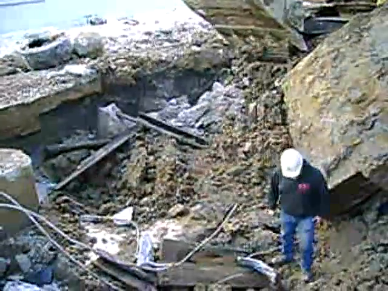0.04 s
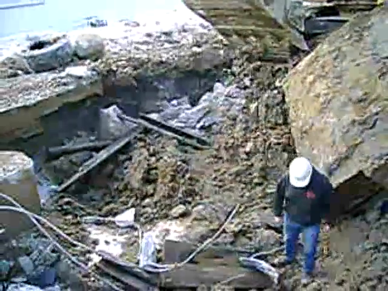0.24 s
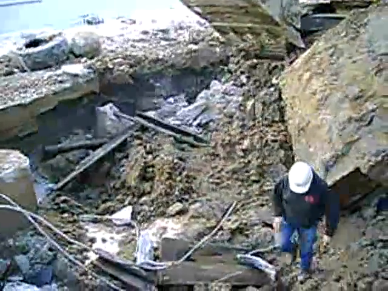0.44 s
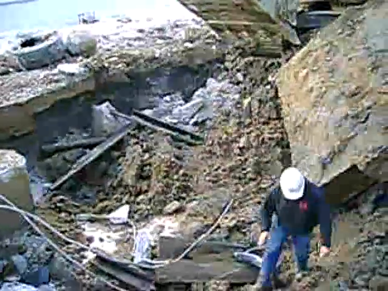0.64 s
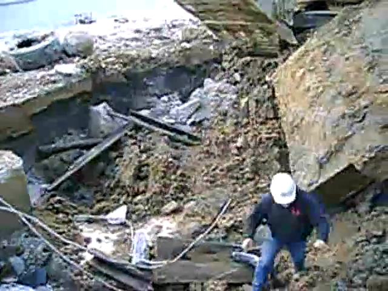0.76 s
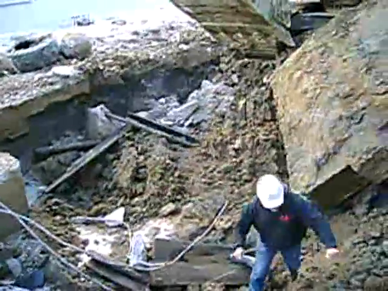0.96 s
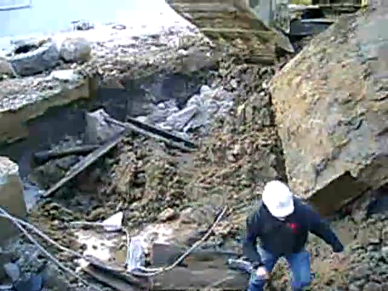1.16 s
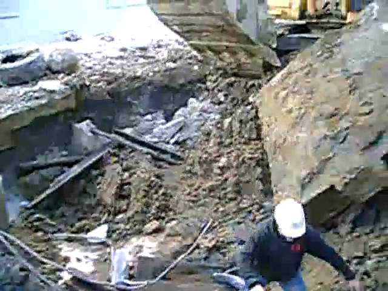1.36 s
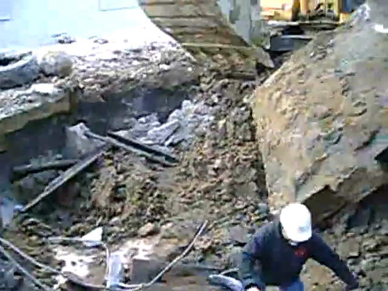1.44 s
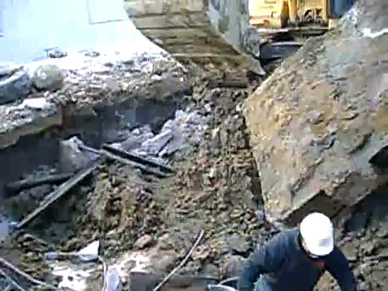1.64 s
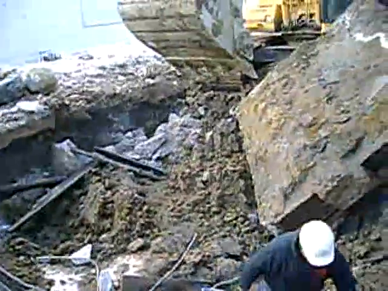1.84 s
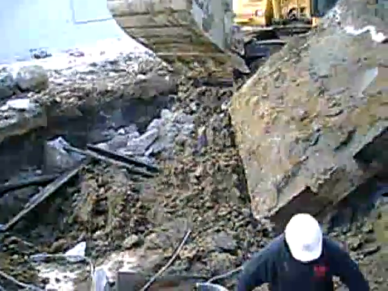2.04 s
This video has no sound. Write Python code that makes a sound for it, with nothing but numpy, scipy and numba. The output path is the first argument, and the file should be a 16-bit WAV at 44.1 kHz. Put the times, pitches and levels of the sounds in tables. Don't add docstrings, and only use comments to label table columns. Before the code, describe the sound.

Steady diesel idle on an open building site, with uneven valve ticks and a wavering pump whine; wind crackles early, eases, then returns in hard thumps around one second and near the end, on a coarse small microphone.

```python
import sys
import numpy as np
from scipy import signal
from scipy.fft import rfft, irfft, next_fast_len
from scipy.io import wavfile
from scipy.ndimage import uniform_filter1d
from numba import njit

SR = 44100
rng = np.random.default_rng(int(sys.argv[2]) if len(sys.argv) > 2 else 0)


def wav_out(sig):
    wavfile.write(sys.argv[1], SR, np.round(np.clip(np.atleast_2d(sig).T, -1, 1) * 32767).astype(np.int16))


def natural_amplitude(level_db):
    exponent = np.asarray(level_db, float) / 20
    return 10 ** exponent


N = 92433


def level(x, db):
    return x * natural_amplitude(db) / np.sqrt(np.mean(x ** 2))


@njit
def svf(x, hz, k):
    low, band = np.empty(len(x)), np.empty(len(x))
    b, l = 0., 0.
    for i in range(len(x)):
        g = np.tan(np.pi * hz[i] / SR)
        v = (b + g * (x[i] - l)) / (1 + g * (g + k))
        low[i], band[i] = l + g * v, k * v
        b, l = 2 * v - b, l + 2 * g * v
    return low, band


def walk(rate):
    hold = int(SR / rate)
    steps = np.repeat(rng.standard_normal(N // hold + 1), hold)
    return 1.2 * uniform_filter1d(uniform_filter1d(steps, hold), hold)[:N]


def band(hz, width):
    return svf(rng.standard_normal(N), np.full(N, 1. * hz), width / hz)[1]


def line(hz, width):
    drift = hz + width * walk(9)
    swell_db = 3.5 * walk(6.5)
    return np.cos(2 * np.pi * np.cumsum(drift) / SR) * natural_amplitude(swell_db)


# middle [t/s], length [t/s], level [level/dB], pitch centre [f/Hz]
WIND_PUFFS = [(.01, 0.047, -29, 465), (0.061, 0.25, -22.5, 260), (0.15, 0.07, -24.5, 190),
              (0.314, 0.011, -37, 170), (0.587, 0.022, -31, 282), (0.812, 0.028, -30.5, 141),
              (0.866, 0.036, -26.5, 296), (0.999, 0.091, -29, 166), (1.068, 0.1, -24, 283),
              (1.176, 0.088, -24.5, 192), (1.325, 0.068, -27, 260), (1.397, 0.076, -28.5, 197),
              (1.679, 0.039, -24.5, 201), (1.762, 0.097, -24, 201), (1.831, 0.034, -22.5, 130),
              (1.887, 0.11, -21.5, 327), (1.98, 0.028, -25, 159), (2.038, 0.051, -33, 164)]


def wind_puffs():
    breeze_db, edge = -41, 3.5
    eddies_per_s, eddy_spread_db = 900, 1.5
    t, rows = np.arange(N) / SR, np.array(WIND_PUFFS)
    middle, length, puff_db = rows[:, :1], rows[:, 1:2], rows[:, 2:3]
    puffs = np.exp(-np.abs(2 * (t - middle) / length) ** edge) * natural_amplitude(puff_db)
    gust = np.sqrt((puffs ** 2).sum(0) + natural_amplitude(breeze_db) ** 2)
    hz = np.interp(t, rows[:, 0], rows[:, 3])

    draw = rng.random((3, N))
    hits = draw[0] < eddies_per_s / SR
    push = np.sign(draw[1] - .55)
    eddies = hits * push * natural_amplitude(-eddy_spread_db * np.log(draw[2] + 0.011))
    knock = svf(eddies - eddies.mean(), hz, 1.4)[1]
    knock = svf(knock, 2.53 * hz, 1.9)[0]
    knock = knock / np.sqrt(uniform_filter1d(knock ** 2, int(0.022 * SR)) + 1e-12)
    return gust * knock


# time [t/s], peak [level/dB], width [ms]
HARD_EDDIES = [(.0014, -13.5, 0.85), (.0083, -13.5, 0.65), (0.0153, -14, 1.24), (0.0204, -14, 1.26),
               (0.0238, -16, 1.0), (0.0323, -9, 1.6), (0.0454, -14, 1.8), (0.0536, -12.5, 1.24),
               (0.06, -10, 1.3), (0.0685, -15, 2.9), (0.0752, -9.5, 1.2), (0.0823, -13, 2.0),
               (.0914, -12, 0.7), (0.1067, -15, 3.3), (0.1297, -11, 1.6), (0.1493, -18, 1.9),
               (0.1636, -17.5, 1.1), (0.5774, -17, 1.4), (0.8339, -14.5, 1.74), (.869, -11.5, 1.6),
               (1.0453, -11, 0.57), (1.0546, -13, 1.1), (1.0589, -12.5, 0.78), (1.0621, -13, 1.08),
               (1.0656, -12, 1.16), (1.0693, -11, 1.14), (1.077, -14.5, 0.96), (1.0884, -10, .8),
               (1.094, -10.5, 1.5), (1.1022, -14, 1.2), (1.107, -11.5, 1.64), (1.1587, -11, 1.57),
               (1.1657, -5, 0.75), (1.1706, -7, 0.81), (1.1768, -8.5, 1.84), (1.1816, -10, 1.5),
               (1.1942, -15.5, 1.94), (1.2163, -13.5, 1.8), (1.3298, -14.5, 1.26), (1.7541, -15, 1.55),
               (1.7908, -18, 1.8), (1.8428, -10.5, 1.5), (1.852, -9, 2.1), (1.8572, -11, 1.2),
               (1.8628, -7.5, 0.65), (1.8742, -9, 0.62), (1.878, -12, 1.1), (1.8819, -7, 1.85),
               (1.8907, -10, 1.5), (1.8946, -17, 0.99), (1.8989, -13, 1.53), (1.904, -14.5, 1.5),
               (1.909, -10.5, .95), (1.9167, -11, 2.9), (1.923, -16, 2.3), (1.9335, -7.5, 0.55)]


def wind_snaps():
    spread, rebound, reach_s = 0.59, 0.77, .012
    t, snaps = np.arange(N) / SR, np.zeros(N)
    for at, db, ms in HARD_EDDIES:
        near = slice(max(int((at - reach_s) * SR), 0), int((at + reach_s) * SR))
        u = ((t[near] - at) / (spread * ms / 1000)) ** 2
        snaps[near] += natural_amplitude(db) * (1 - rebound * u) * np.exp(-u / 2)
    return -snaps


def wind():
    rumble = level(band(7.9, 11), -37.5)
    return wind_puffs() + wind_snaps() + rumble


# [f/Hz], level per Hz of width [level/dB]
FAN_ROAR = [(25, -7.5), (110, -4.5), (330, -13), (900, -6), (1500, -15), (2100, -20), (2600, -19.5),
            (3600, -28)]
# [f/Hz], width [f/Hz], [level/dB]
HOOD_RINGS = [
    (2533, 470, -41.5),
    (4650, 250, -47.5),
    (1858, 250, -41),
]


def roar():
    shared_db, flicker_db = .4, 1.63
    out, flutter, table = 0, walk(13.88), np.array(FAN_ROAR)
    for hz in 25 * 2 ** (np.arange(25) / 3):
        db = np.interp(np.log(hz), np.log(table[:, 0]), table[:, 1])
        db = db + 10 * np.log10(hz)
        ring = svf(band(hz, hz / 3), np.full(N, hz), 1 / 3)[1]
        out = out + level(ring, db) * natural_amplitude(shared_db * flutter + flicker_db * walk(10.94))
    out = level(out, -24.5)
    for hz, width, db in HOOD_RINGS:
        out = out + level(band(hz, width), db)
    return out


# [t/s], [level/dB]
LOAD_ON_PUMP = [(0, -34.5), (.15, -34.5), (.3, -41), (.72, -40), (.8, -31.5), (.9, -36.5), (1.05, -31.5),
                (1.2, -47), (1.33, -29.5), (1.42, -39), (1.6, -39.5), (1.75, -46), (1.85, -34), (2.0, -39),
                (2.09, -42.5)]


def pump():
    whine_hz, waver_hz = 882, 3.44
    load = np.array(LOAD_ON_PUMP)
    load_db = np.interp(np.arange(N) / SR, load[:, 0], load[:, 1])
    hz = whine_hz + waver_hz * walk(7.53)
    return np.sqrt(2) * np.cos(2 * np.pi * np.cumsum(hz) / SR) * natural_amplitude(load_db)


WHINE_PITCHES = [753, 800, 944, 996, 1050, 1253, 1401, 1510, 1609, 1735, 1901, 2396]
WHINE_LEVELS = [-42, -52.5, -41, -41, -44.5, -50, -47.5, -50, -52, -51.5, -49, -48]


def whine():
    return sum(level(line(hz, .006 * hz), db) for hz, db in zip(WHINE_PITCHES, WHINE_LEVELS))


FIRING_HZ = 45.25
CYLINDER_TICKS = [0, -13, -1.5, -5, -4.5, -1]
# [f/Hz], width [f/Hz], [level/dB]
VALVE_RINGS = [
    (2690, 1300, -47),
    (5030, 1700, -44.5),
]


def ticks():
    decay_s, late, scatter_db = 0.0043, 0.55, 2
    shot = np.arange(int(N / SR * FIRING_HZ) - 1)
    chance = np.tanh(rng.standard_normal((2, len(shot))))
    at = ((shot + 1 + late * chance[0]) / FIRING_HZ * SR).astype(int)
    gate = np.zeros(N)
    gate[at] = natural_amplitude(np.array(CYLINDER_TICKS)[shot % 6] + scatter_db * chance[1])
    gate = signal.lfilter([1], [1, -np.exp(-1 / (decay_s * SR))], gate)
    return sum(level(gate * band(hz, width), db) for hz, width, db in VALVE_RINGS)


# multiple of the firing rate, [level/dB]
EXHAUST_HUM = [
    (1, -31),
    (2, -59),
    (3, -34.5),
    (4.04, -41.5),
    (5, -47.5),
]


def exhaust():
    wobble = .0012
    t = np.arange(N) / SR - .1
    turns = FIRING_HZ * t + np.cumsum(FIRING_HZ * wobble * walk(3.5)) / SR
    hum = level(np.cos(2 * np.pi * 51.05 * t), -37)
    for multiple, db in EXHAUST_HUM:
        tone = np.cos(2 * np.pi * multiple * turns)
        hum = hum + level(tone, db) * natural_amplitude(0.27 * walk(4.4))
    return hum


def engine():
    return pump() + whine() + ticks() + exhaust()


def scene():
    return (wind() + roar() + engine())[None, :]


def low_pass(x):
    return signal.sosfilt(signal.butter(12, 7000, fs=SR, output="sos"), x)


def record(dry):
    mic_hz, alias_db_per_khz, step_noise_db, step_s = 6830, 22, -10.5, 0.00033
    slow = signal.resample_poly(np.tanh(dry[0]), up=1, down=4)
    step = uniform_filter1d(np.abs(np.diff(slow, prepend=0)), 1 + int(step_s * SR / 4))
    noisy = slow + natural_amplitude(step_noise_db) * step * rng.standard_normal(len(slow))
    size = next_fast_len(N + 4096)
    held = np.zeros(size)
    held[:4 * len(slow):4] = 4 * noisy
    hz = np.fft.rfftfreq(size, 1 / SR)
    mirror_loss = 1 + natural_amplitude(alias_db_per_khz * (hz - SR / 8) / 1000)
    gain = 1 / mirror_loss / (1 + (hz / mic_hz) ** 40)
    mix = irfft(rfft(held) * gain, size)[None, :N]
    return low_pass(mix)


dry = scene()
out = record(dry)
wav_out(out)
```